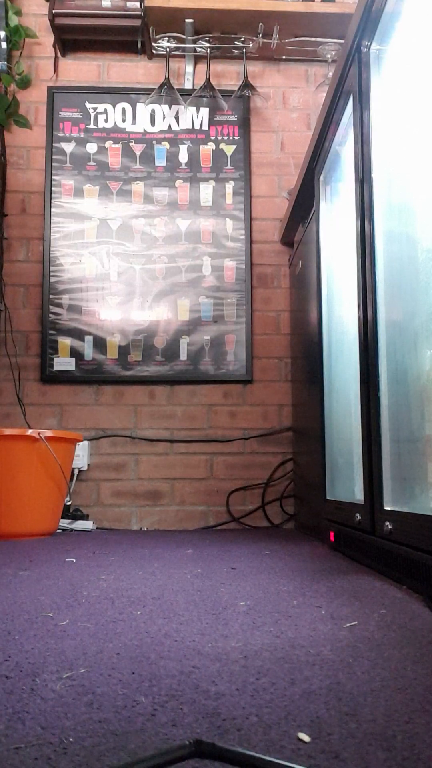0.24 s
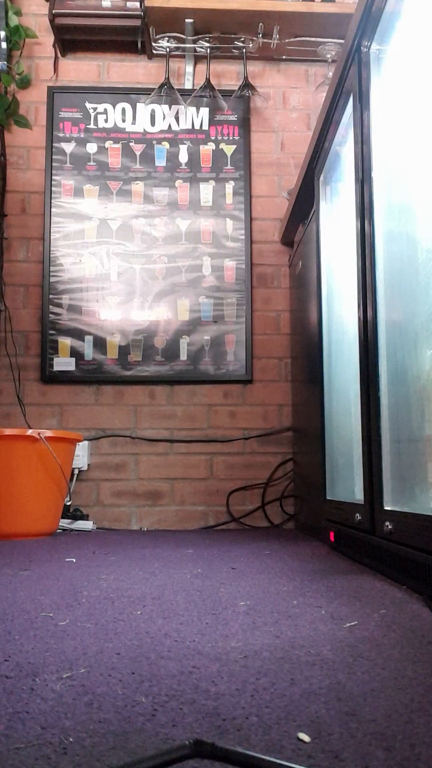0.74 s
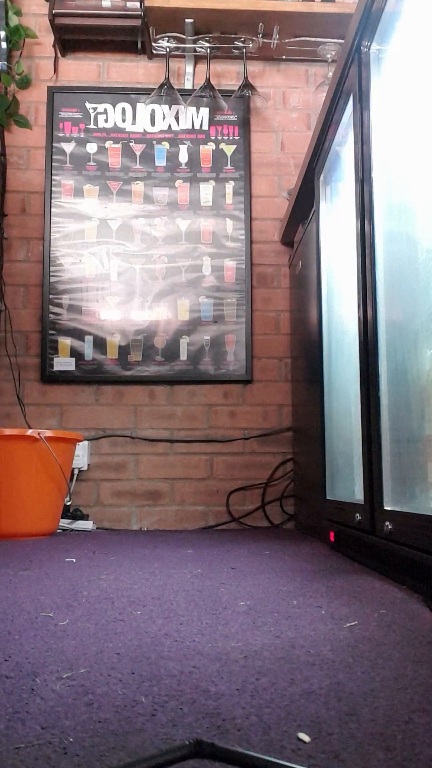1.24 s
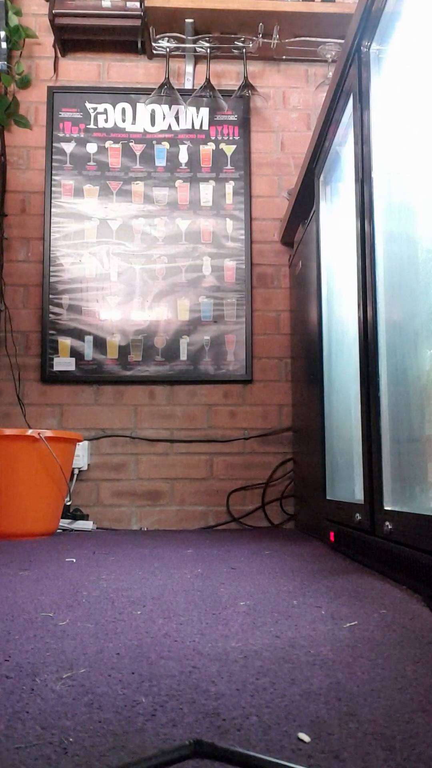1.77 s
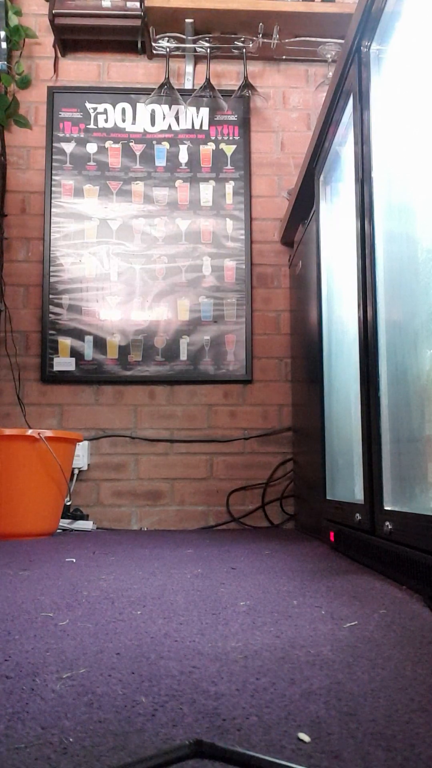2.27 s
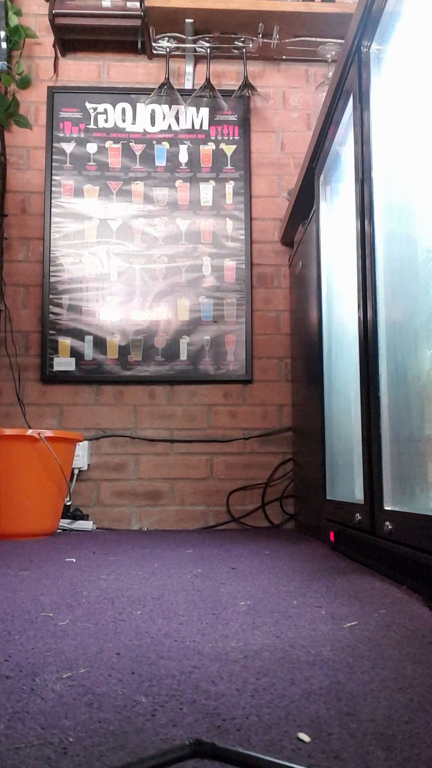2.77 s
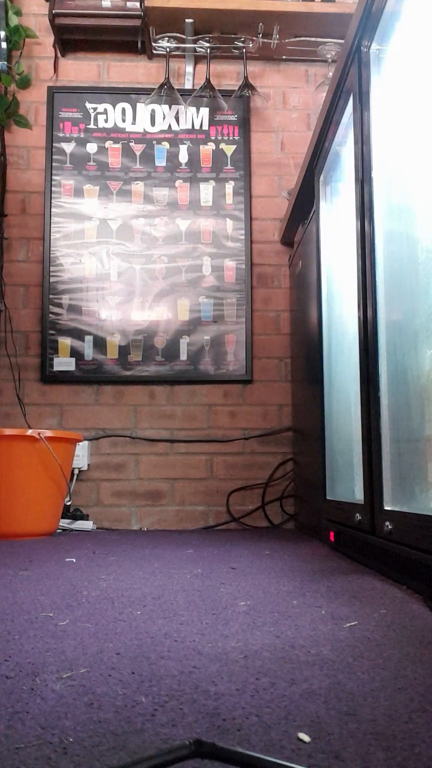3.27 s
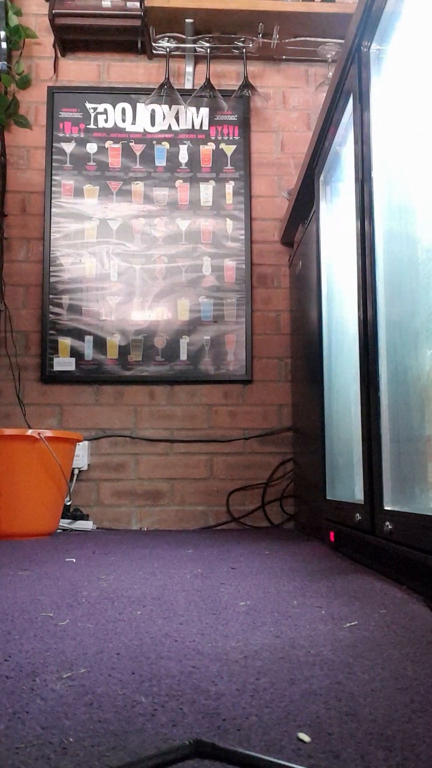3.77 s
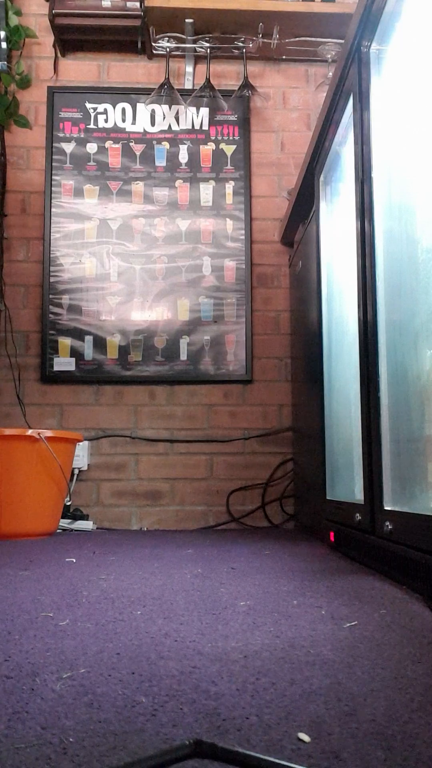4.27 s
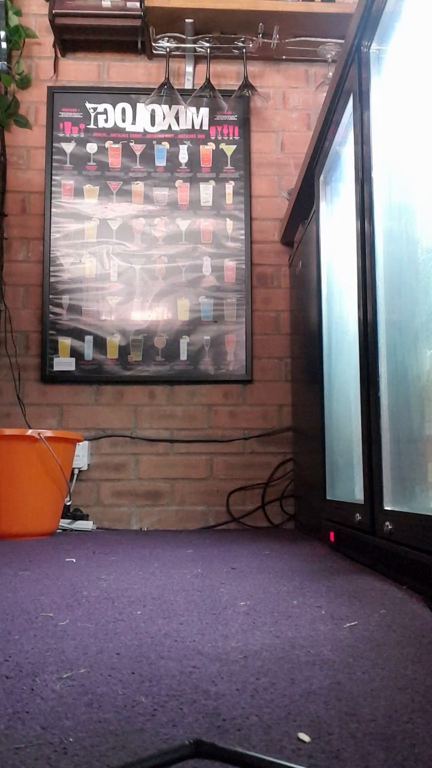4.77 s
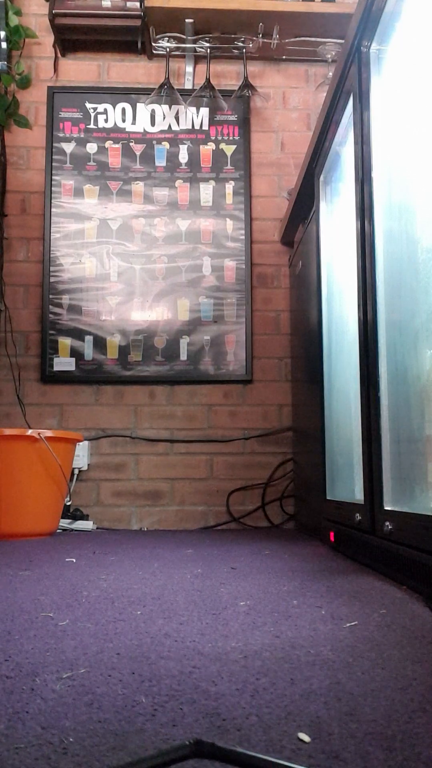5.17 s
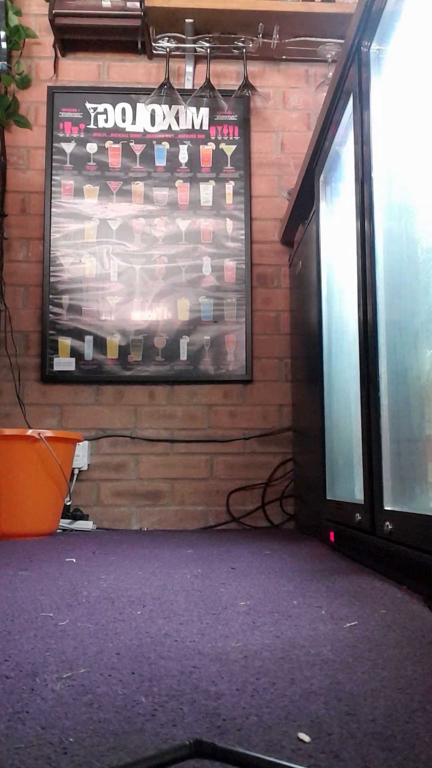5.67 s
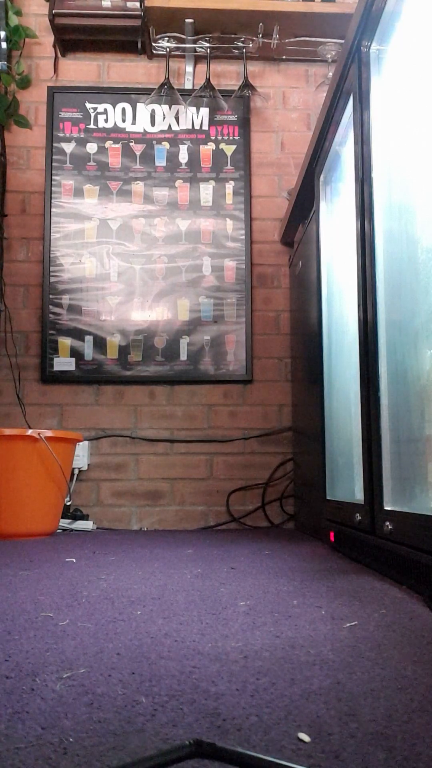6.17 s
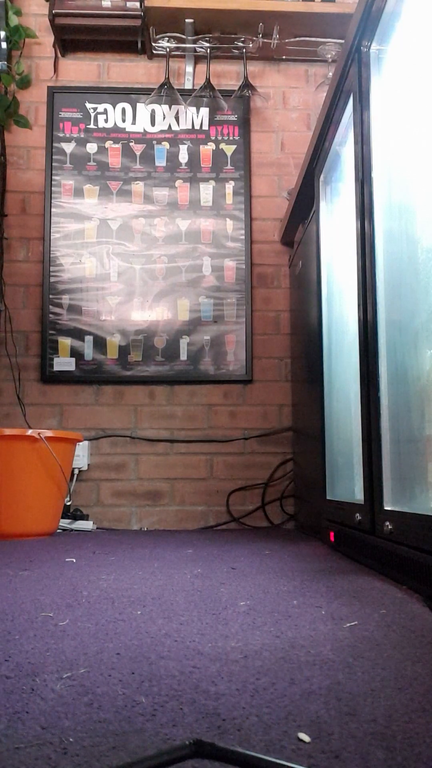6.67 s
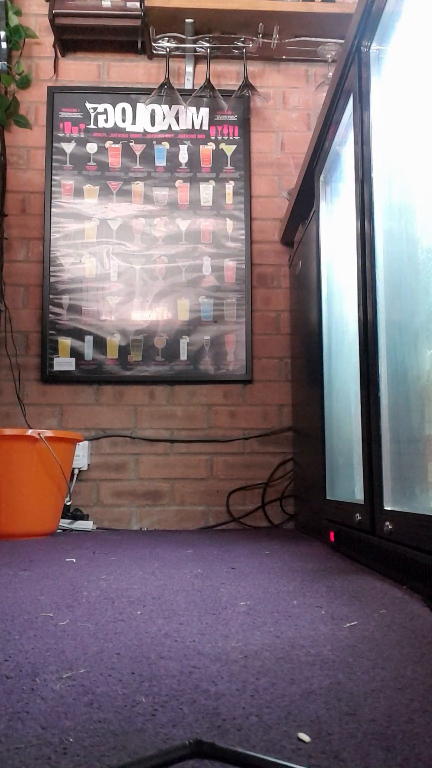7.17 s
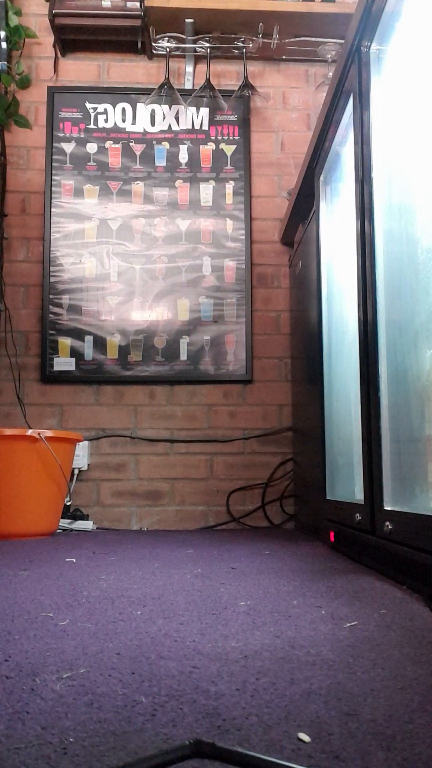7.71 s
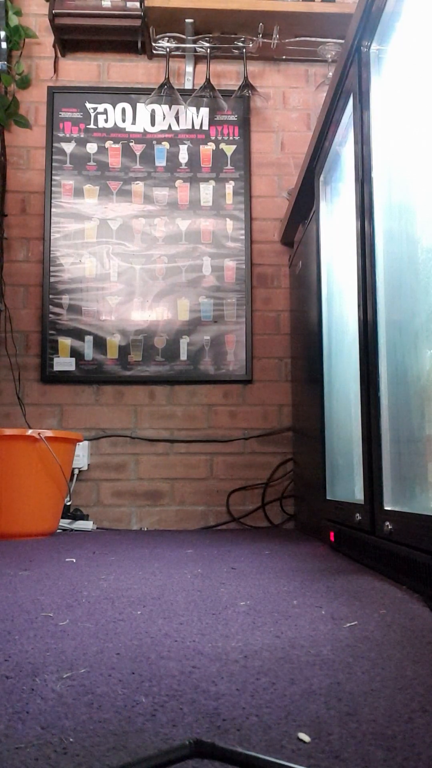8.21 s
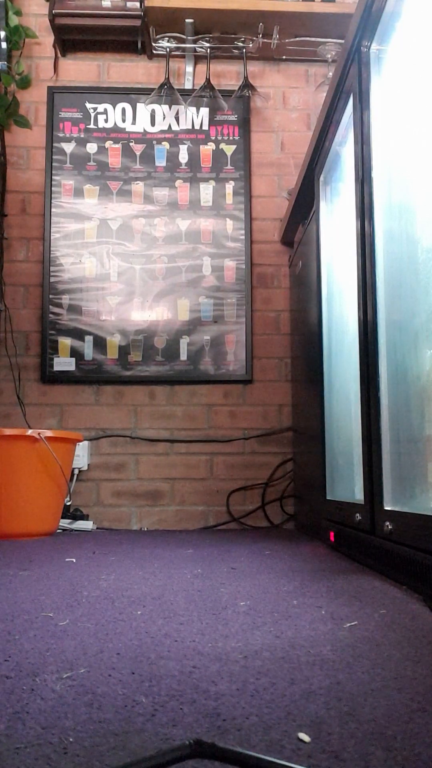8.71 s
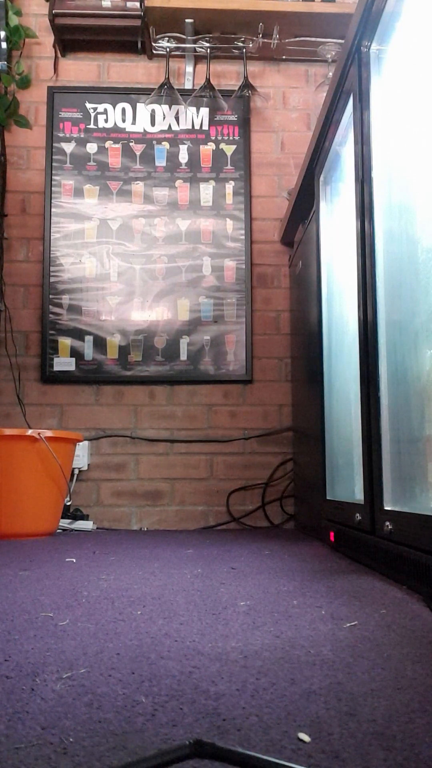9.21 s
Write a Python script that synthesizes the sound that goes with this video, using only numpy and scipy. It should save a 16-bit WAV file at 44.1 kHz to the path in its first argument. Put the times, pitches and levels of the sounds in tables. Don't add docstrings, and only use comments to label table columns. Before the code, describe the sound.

Low steady fridge hum with throbbing motor whine, distant soft thumps, tiny ticks, and a brief burst of nearby carpet scuffs and floor thuds.

```python
import sys
import numpy as np
from scipy import signal
from scipy.fft import rfft, irfft, next_fast_len
from scipy.io import wavfile
from scipy.ndimage import uniform_filter1d

SR = 44100
rng = np.random.default_rng(int(sys.argv[2]) if len(sys.argv) > 2 else 0)


def field_ratio(decibels):
    return 10 ** (np.asarray(decibels, dtype=float) / 20)


def persist_wave(psi):
    counts = np.round(np.clip(psi, -1, 1) * 32767).astype(np.int16)
    wavfile.write(sys.argv[1], SR, np.atleast_2d(counts).T)


N = 416744
TIME, SIZE = np.arange(N) / SR, next_fast_len(N)
HZ = np.arange(SIZE // 2 + 1) * SR / SIZE + 1e-3

BLADE_HZ, SLOT_HZ, MAINS_HZ = 191.85, 652.7, 49.95
# (left [dB], right [dB], left lead [rad])
BLADE_TONES = [(-56, -55, 0.074), (-78.5, -79, 0.19), (-81.5, -74, 0.532), (-85, -85.5, 0.91),
               (-85.5, -86.5, 1.87)]
# (left [dB], right [dB], left lead [rad])
SLOT_WHINE = [(-69.5, -68, .55), (-65.5, -61, 0.63), (-71, -66, .9), (-90.5, -85, 1.385)]
# (left [dB], right [dB], left lead [rad])
CORE_BUZZ = (-76, -79, 0.65)
# (frequency [Hz], density [dB/Hz])
AIR_SPECTRUM = [(15, -108), (30, -99), (100, -91), (170, -86), (230, -90), (330, -94.5), (430, -103),
                (520, -99), (700, -98.5), (900, -103), (1100, -111), (1500, -120), (2500, -135),
                (20000, -150)]
# (frequency [Hz], width [Hz], lift [dB])
AIR_MODES = [(39, 10, 3), (65, 10, 9), (135.3, 22, 13), (326, 29, 1.5), (495, 40, 2.5), (616, 40, 5.5),
             (706, 34, 7), (911, 61, 5.5), (1310, 50, 9.5)]
RUMBLE_EARLY_DB, RUMBLE_LATE_DB, SHAKE_DB, SHAKE_T60_S = -69.5, -75.5, -16, 0.99

GRILLE_HZ, GRILLE_WIDTH_HZ, GRILLE_DB, GRILLE_FLARE_DB = 2280, 200, -116, 3
# (time [s], swell [dB])
GUSTS = [
    (5.75, 4),
    (6.46, 9.3),
    (6.67, 8.9),
    (7.22, 5.5),
    (8.6, 4),
    (8.9, 7.9),
    (9.35, 7.8),
]
GUST_S = 0.06

# (frequency [Hz], left [dB/Hz], right [dB/Hz])
MIC_HISS = [(20, -125, -125), (70, -99, -99), (308, -104, -104), (900, -112, -113), (1818, -116, -117),
            (3780, -119, -120), (6000, -125, -127), (8350, -131, -133), (9900, -125, -128),
            (11150, -120, -120), (15300, -118, -119), (20000, -118, -119)]
TOP_HZ = 15750
# (frequency [Hz], left minus right [dB], likeness [0-1], left lead [rad])
PORT_PAIR = [(40, 1.3, 1, .03), (260, 0, .98, .2), (500, -1.5, .93, .55), (750, -4, .75, 1.3),
             (1000, -1, .45, 2.6), (1300, 2, .75, 3.4), (1800, 3, .75, 3.9), (2400, 6, .3, 5.5),
             (3900, 12, .2, 9), (5200, 23, .3, 11), (6500, 32, .3, 14), (9500, 33, .3, 20),
             (12000, 17, .3, 25), (15000, 4, .1, 30)]

# (frequency [Hz], density [dB/Hz])
RUSTLE_SPECTRUM = [(1200, -39.5), (1900, -11.5), (2300, -8.5), (3000, -11.5), (4500, -18), (5600, -24.5),
                   (6500, -16), (7200, -26), (8000, -41)]
# (time [s], swell [dB])
CLOTH_STIRS = [
    (.12, 7),
    (.55, 10),
    (1.3, 8.5),
    (1.93, 11),
    (2.95, 5),
]
STIR_S, RESTLESS_DB, SETTLED_DB, SETTLES_S = 0.083, 5, -2, 3.7

# (time [s], peak [dB], settled pitch [Hz])
FAR_STEPS = [(0.185, -40, 70), (.27, -49, 54.6), (.5, -52, 66.6), (1.101, -55, 70), (1.9, -51.5, 65),
             (2.232, -42, 78.3), (2.319, -50, 75), (2.36, -57, 33), (3.461, -42.5, 57.7), (3.5, -44.5, 39),
             (5.471, -41, 59.4), (5.525, -43, 71.6), (5.98, -64, 38), (6.8, -55, 64.7), (7.73, -50, 58.3),
             (8.4, -61, 39), (8.799, -54, 66.2), (8.84, -56, 28)]
FAR_T60_S, FAR_KNOCK_DB = 0.47, -12.5
# (time [s], peak [dB], settled pitch [Hz])
NEAR_STEPS = [(3.39, -40.5, 86.8), (4.122, -37, 90), (4.165, -32.5, 84.5), (4.206, -13, 91.7),
              (4.235, -15.5, 65), (4.246, -15.5, 40), (4.279, -16, 65), (4.3, -27, 32.2),
              (4.324, -23.5, 66.8), (4.362, -26, 39.8), (4.408, -36.5, 64), (4.46, -33.5, 31.9),
              (4.538, -36, 71), (4.632, -46, 116), (4.685, -28, 104.5), (4.761, -41, 74.5),
              (4.841, -43, 98.6), (4.909, -37.5, 63), (4.981, -45, 66.7)]
NEAR_RING_CYCLES = 9.4
NEAR_KNOCK_DB, KNOCK_PER_DB, KNOCK_PER_OCTAVE_DB = -3, -0.3653, 12.5
# (frequency [Hz], density [dB/Hz])
BOARD_KNOCK = [(20, -18), (42, -6.5), (65, -1), (105, 0), (165, -0.5), (226, -8), (300, -17.5), (600, -21),
               (20000, -91.5)]

# (time [s], length [s], level [dB], body [dB])
TICKS = [
    (1.126, 0.007, -54.5, -23),
    (1.137, 0.005, -46, -25),
    (3.964, 0.0052, -52.5, 8),
    (3.973, 0.0051, -50.5, 6.5),
]
# (frequency [Hz], density [dB/Hz])
TICK_SPECTRUM = [(300, -16.5), (850, -0.5), (1200, -6), (1700, -7), (2700, -8), (3300, -8.5), (4100, -17),
                 (5000, -5), (5800, -2), (6600, -5.5), (7400, -15), (8400, -24), (11000, -17), (15500, -28)]
TICK_BANDS_DB = (-1, 0.5, -11)

# (time [s], length [s], pressure [dB], upward tilt [dB/band], singing pitch [Hz])
SCUFFS = [(3.216, 0.04, -68, -1, 6500), (3.273, 0.088, -52.5, 0, 6500), (3.307, 0.027, -45, 1, 3500),
          (3.337, 0.062, -52.5, 2, 3000), (3.373, 0.034, -36.5, -0.6, 6000), (3.4, 0.022, -41, 3.5, 3500),
          (3.416, .024, -33, 0, 6200), (3.45, .017, -53, 5, 11000), (4.116, 0.034, -52, 1, 6000),
          (4.137, 0.043, -41, -0.5, 5000), (4.173, 0.042, -35, -1.5, 2747),
          (4.203, 0.032, -28.5, 1.5, 11100), (4.253, 0.038, -43, 1.5, 11060),
          (4.302, 0.073, -51.5, -0.5, 3000), (4.359, .022, -40, 1, 5500), (4.394, 0.067, -56.5, 0, 3500),
          (4.49, 0.026, -47.5, -4, 6490), (4.505, 0.041, -46.5, -3, 6510), (4.563, 0.014, -39, -2.5, 3000),
          (4.588, .033, -48, -4, 2604), (4.623, 0.027, -35.5, -0.4, 6000), (4.645, .02, -27, -0.9, 6000),
          (4.668, .04, -35.5, 0.1, 1688), (4.74, 0.18, -71, -0.5, 1000)]
# (frequency [Hz], density [dB/Hz])
SOLE_SPECTRUM = [(80, -41), (250, -6), (420, -10), (760, -7.5), (960, -5), (1150, -5.5), (1400, -3),
                 (1850, -6), (2400, -11.5), (4000, -10.5), (6200, -10.5), (7300, -15), (8400, -25.5),
                 (11000, -18), (13000, -25), (15500, -38)]
SCUFF_BANDS_DB = (1.5, -3.5, -2.5, -9.5)
BANDS_HZ = (1000, 3100, 6000, 11000)
SING_DB, SING_OCTAVES = 8, 0.34
SHEEN_PER_DB = 0.26
# (T60 [s], echo share [dB])
ROOM_BANDS = [(0.27, -4), (0.27, -1), (0.29, -6), (0.2, 2.5)]

# (time [s], peak [dB], treble lift [dB/octave])
CLIPS = [
    (4.566, -37, 3.5),
    (4.646, -27, -3.5),
    (4.385, -47, -2),
]
# (frequency [Hz], level [dB], T60 [s])
CLIP_MODES = [(960, -3.5, .12), (1325, -6, .08), (1815, -0.5, .1), (2720, -2, 0.079), (3500, -8, .05)]


def along(table, column=1):
    table = np.array(table, float)
    return np.interp(np.log(HZ), np.log(table[:, 0]), table[:, column])


def colour(x, db):
    return irfft(rfft(x, SIZE) * field_ratio(db) * np.sqrt(SR / 2), SIZE)[:N]


def white():
    return rng.standard_normal(N)


def walk(rate_hz):
    k = int(SR / rate_hz)
    held = np.repeat(rng.standard_normal(N // k + 1), k)
    return 1.3 * uniform_filter1d(uniform_filter1d(held, k), k)[:N]


def split(x, edges_hz):
    low = [0 * HZ] + [1 / (1 + (HZ / e) ** 8) for e in edges_hz] + [1 + 0 * HZ]
    spectrum = rfft(x, SIZE)
    return np.array([irfft(spectrum * (b - a), SIZE)[:N] for a, b in zip(low, low[1:])])


def ports(a, b):
    like = along(PORT_PAIR, column=2)
    lag = np.exp(-1j * along(PORT_PAIR, column=3))
    right = like * lag * rfft(a, SIZE) + np.sqrt(1 - like ** 2) * rfft(b, SIZE)
    return np.array([a, irfft(right * field_ratio(-along(PORT_PAIR)), SIZE)[:N]])


def linger(power, t60_s):
    keep = np.exp(-2 * np.log(1000) / (t60_s * SR))
    return signal.lfilter([1 - keep], [1, -keep], power)


def tone(cycles, left_db, right_db, lead_rad, flutter_db):
    size = np.sqrt(2) * field_ratio(flutter_db * walk(9))
    phase = 2 * np.pi * cycles
    return size * np.array([field_ratio(left_db) * np.sin(phase + lead_rad), field_ratio(right_db) * np.sin(phase)])


def motor():
    shaft_s = np.cumsum(1 + .001 * walk(.5)) / SR
    pull = 2 * MAINS_HZ * TIME
    blades = sum(tone((k + 1) * BLADE_HZ * shaft_s, *row, flutter_db=1.07)
                 for k, row in enumerate(BLADE_TONES))
    whine = sum(tone(SLOT_HZ * shaft_s + (k - 1) * pull, *row, flutter_db=0.73)
                for k, row in enumerate(SLOT_WHINE))
    return blades + whine + tone(3 * pull, *CORE_BUZZ, flutter_db=3.5)


def footfalls():
    steps = [(s, db, hz, FAR_T60_S, FAR_KNOCK_DB) for s, db, hz in FAR_STEPS]
    for s, db, hz in NEAR_STEPS:
        knock_db = NEAR_KNOCK_DB + KNOCK_PER_DB * (db + 39) + KNOCK_PER_OCTAVE_DB * np.log2(hz / 65)
        steps.append((s, db, hz, NEAR_RING_CYCLES / hz, knock_db))
    return steps


def house_db():
    shake = np.zeros(N)
    t = TIME[:SR // 2]
    for s, db, _, t60_s, _ in footfalls():
        i = int(s * SR)
        shake[i:i + len(t)] += field_ratio(2 * (db - 60 * t / t60_s))
    rest_db = RUMBLE_EARLY_DB + (RUMBLE_LATE_DB - RUMBLE_EARLY_DB) * TIME / TIME[-1]
    return 10 * np.log10(field_ratio(2 * rest_db) + field_ratio(2 * SHAKE_DB) * linger(shake, SHAKE_T60_S))


def air():
    lifts = (lift_db / (1 + (2 * (HZ - hz) / width_hz) ** 2) for hz, width_hz, lift_db in AIR_MODES)
    db = along(AIR_SPECTRUM) + sum(lifts)
    rumble_db = house_db() + 73
    swells = field_ratio([rumble_db + 2.5 * walk(6.6), 0.17 * rumble_db + 2.0 * walk(2.635),
                  2.5 * walk(1.92), 0.34 * walk(4.7)])
    edges_hz = (105, 170, 400)
    return ports(*(np.sum(swells * split(colour(white(), db), edges_hz), axis=0) for _ in range(2)))


def grille():
    db = GRILLE_DB - 20 * np.log10(1 + (2 * (HZ - GRILLE_HZ) / GRILLE_WIDTH_HZ) ** 2)
    gusts_db = sum(gust_db * np.exp(-.5 * ((TIME - s) / GUST_S) ** 2) for s, gust_db in GUSTS)
    flare = field_ratio(GRILLE_FLARE_DB * walk(14) + gusts_db)
    return ports(*(flare * colour(white(), db) for _ in range(2)))


def rustle():
    db = SETTLED_DB + (RESTLESS_DB - SETTLED_DB) / (1 + np.exp(2 * (TIME - SETTLES_S)))
    db = db + sum(swell_db * np.exp(-.5 * ((TIME - s) / STIR_S) ** 2) for s, swell_db in CLOTH_STIRS)
    swells = field_ratio([0.27 * db + 0.94 * walk(20), 0.8 * db + 1.2 * walk(6.5)])
    spectrum_db = along(RUSTLE_SPECTRUM) - 104
    return ports(*(np.sum(swells * split(colour(white(), spectrum_db), (4600,)), axis=0) for _ in range(2)))


def thumps():
    bend, knock = np.zeros(N), np.zeros(N)
    t = TIME[:SR // 2]
    for s, db, hz, t60_s, knock_db in footfalls():
        i = int(s * SR)
        cycles = hz * (t + .4 * .03 * (1 - np.exp(-t / .03)))
        size = field_ratio(db - 60 * t / t60_s) * np.clip(4.4 * hz * t, 0, 1)
        bend[i:i + len(t)] += size * np.sin(2 * np.pi * cycles)
        knock[i:i + len(t)] += (size * field_ratio(knock_db)) ** 2
    wood = colour(white(), along(BOARD_KNOCK) - 22)
    floor = bend + wood * np.sqrt(knock + field_ratio(-4.5) * linger(knock, 0.34))
    return ports(floor, 0 * floor)


def rub(events, spectrum, band, patchy_db, ring):
    push = np.zeros((4, N))
    for s, length_s, *band_db in events:
        i = slice(int(s * SR), int((s + 1.3 * length_s) * SR))
        shape_db = np.interp((TIME[i] - s) / length_s, [0, .33, 1, 1.3], [-24, 0, 0, -30])
        push[:, i] += field_ratio(shape_db + np.array(band_db)[:, None])
    tail = np.sqrt([linger(p ** 2, t60_s * ring) * field_ratio(2 * db) for p, (t60_s, db) in zip(push, ROOM_BANDS)])
    edges_hz = (450, 800, 1300, 2100, 3100, 4500, 5700, 7000, 8300, 11500)
    patches = field_ratio([patchy_db * walk(35) for _ in band])
    spectrum_db = along(spectrum) - 27
    paths = []
    for _ in range(2):
        grains = white() * field_ratio(1.8 * rng.exponential(size=N) + 3 * walk(130) - 3.5)
        direct = split(colour(grains, spectrum_db), edges_hz)
        diffuse = split(colour(white(), spectrum_db), edges_hz)
        paths.append(np.sum(patches * (field_ratio(-7.0) * push[band] * direct + tail[band] * diffuse), axis=0))
    return ports(*paths)


def ticks():
    taps = [(s, length_s, db + body_db, *(db + np.array(TICK_BANDS_DB))) for s, length_s, db, body_db in TICKS]
    return rub(taps, TICK_SPECTRUM, [0, 0, 0, 1, 1, 1, 2, 2, 2, 3, 3], patchy_db=.5, ring=1.1)


def drag_db(db, tilt_db, hz):
    steps = np.arange(4) - 1.5
    sing_db = SING_DB * np.exp(-(np.log2(np.array(BANDS_HZ) / hz) / SING_OCTAVES) ** 2)
    sheen_db = (steps > 1) * SHEEN_PER_DB * (db + 41)
    return db + np.array(SCUFF_BANDS_DB) + tilt_db * steps + sing_db + sheen_db


def scuffs():
    drags = [(s, length_s, *drag_db(*press)) for s, length_s, *press in SCUFFS]
    return rub(drags, SOLE_SPECTRUM, [0, 0, 0, 0, 1, 1, 2, 2, 2, 3, 3], patchy_db=2, ring=1)


def clips():
    out, t = np.zeros(N), TIME[:SR // 4]
    for s, db, lift_db in CLIPS:
        i = int(s * SR)
        for hz, mode_db, t60_s in CLIP_MODES:
            level_db = db + mode_db + lift_db * np.log2(hz / 1800) - 60 * t / t60_s
            out[i:i + len(t)] += field_ratio(level_db) * np.sin(2 * np.pi * hz * t) * np.clip(t / .002, 0, 1)
    return ports(out, np.roll(out, 90))


def scene():
    fridge = motor() + air() + grille()
    return fridge + rustle() + thumps() + ticks() + scuffs() + clips()


def top_cut(x):
    return signal.sosfilt(signal.butter(12, 15690, fs=SR, output="sos"), x)


def record(dry):
    hiss = np.array([colour(white(), along(MIC_HISS, column=k)) for k in (1, 2)])
    low_pass = signal.ellip(8, .2, 60, TOP_HZ, fs=SR, output="sos")
    mix = signal.sosfilt(low_pass, dry + hiss)
    return top_cut(mix)


dry = scene()
out = record(dry)
persist_wave(out)
```